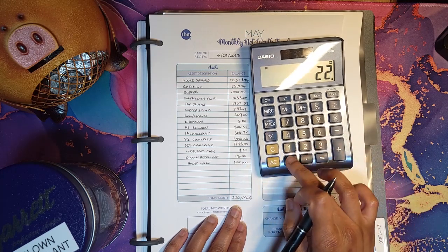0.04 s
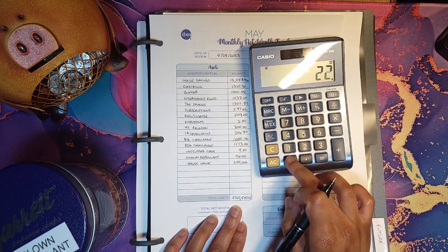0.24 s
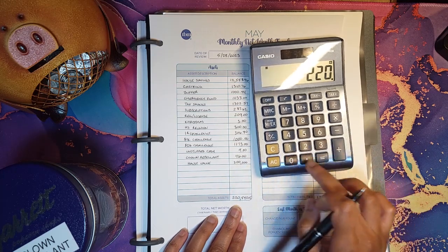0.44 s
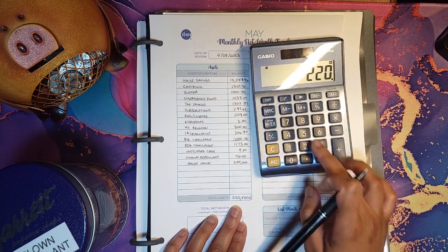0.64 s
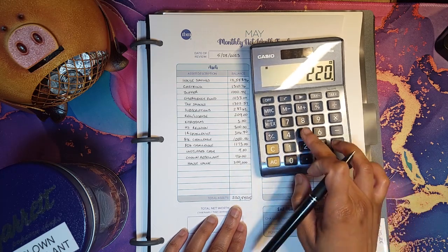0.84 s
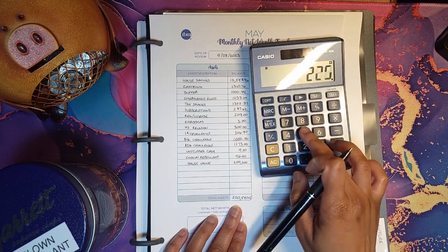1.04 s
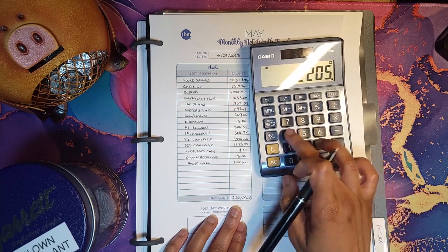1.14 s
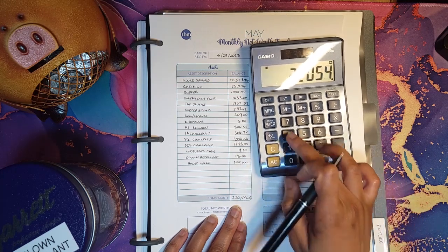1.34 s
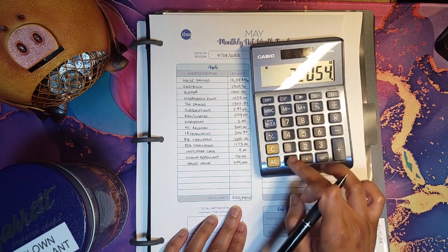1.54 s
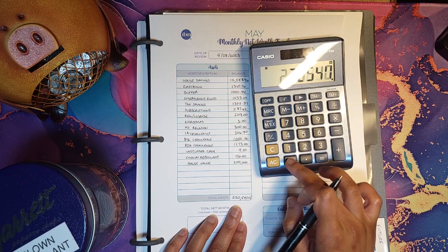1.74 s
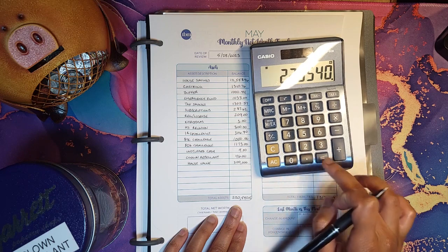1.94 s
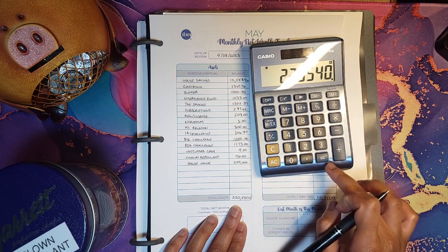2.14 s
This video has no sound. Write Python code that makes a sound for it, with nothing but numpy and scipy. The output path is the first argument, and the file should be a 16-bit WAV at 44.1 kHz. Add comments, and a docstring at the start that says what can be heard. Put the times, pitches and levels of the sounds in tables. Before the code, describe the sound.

A finger presses plastic calculator keys: two early taps, a pause, then several irregular clicks. Soft booms through desk and dull paper thuds accompany them, over low rumble and faint hiss, heard close in a small room.

```python
"""A small quiet room: a finger works the plastic keys of a desktop calculator lying on a paper binder.
Each key clicks thinly and knocks the hollow case, made by short noise bursts that set dying tones ringing.
The finger's weight booms the desk top a moment apart, the binder thuds dully and keys brush in their guides.
The microphone is fixed to the desk, nearly mono; shaped noise gives a low rumble and faint hiss."""
import sys
import numpy as np
from scipy import signal
from scipy.fft import rfft, irfft
from scipy.io import wavfile

SR = 44100
rng = np.random.default_rng(int(sys.argv[2]) if len(sys.argv) > 2 else 0)


def attenuation_scalar(level_db):
    """Turn a level in dB into a linear amplitude multiplier (20 dB per decade)."""
    decades = np.asarray(level_db, float) / 20
    return 10 ** decades


def store_wav(level_fs):
    """Save 16-bit WAV to argv[1]."""
    pcm = np.round(np.clip(np.atleast_2d(level_fs), -1, 1) * 32767)
    wavfile.write(sys.argv[1], SR, pcm.T.astype(np.int16))


N = 97020  # length in samples, 2.2 s


def read(points, hz):
    """Reads a table of pitches, in straight lines along log frequency."""
    f, value = np.transpose(points)
    return np.interp(np.log(hz + 1), np.log(f + 1), value)


def add(mix, s, sound):
    """Mixes a sound in at a time in seconds."""
    part = mix[round(s * SR):][:len(sound)]
    part += sound[:len(part)]


def ring(hz, t60, t):
    """One mode: a pure tone that falls by 60 dB in t60 seconds."""
    return attenuation_scalar(-60 * t / t60) * np.sin(2 * np.pi * hz * t)


def coloured(shape):
    """Steady noise of a given spectrum, scaled to unit rms above 150 Hz."""
    hz = np.fft.rfftfreq(N, 1 / SR)
    z = rfft(rng.standard_normal(N)) * attenuation_scalar(read(shape, hz))
    return irfft(z, N) / np.std(irfft(z * (hz > 150), N))


def body(modes, centre_hz, spread_oct, t):
    """Ringing of a set of modes, strongest around one pitch, scaled to unit energy."""
    rings = np.zeros(len(t))
    for k, (hz, db, t60) in enumerate(modes):
        rings += (-1) ** k * attenuation_scalar(db) * ring(hz, t60, t)
    hz = np.fft.rfftfreq(len(t), 1 / SR) + 1
    octaves = np.log2(hz / centre_hz)
    bump_db = np.maximum(-6. * (octaves / spread_oct) ** 2, -17.5)
    # minimum phase, so that nothing sounds ahead of the blow
    log_gain = np.log(attenuation_scalar(np.r_[bump_db, bump_db[-2:0:-1]]))
    causal = np.exp(np.conj(signal.hilbert(log_gain)))[:len(hz)]
    rings = irfft(rfft(rings) * causal, len(t))
    return rings / np.linalg.norm(rings)


# colour of the room air: (pitch [Hz], relative level [dB per Hz])
AIR_COLOUR = [(12, -26), (20, -29), (42, -13.5), (76, -7.5), (213, -24), (245, -19.5), (298, -29),
              (333, -28.5), (505, -44), (581, -34.5), (705, -34.5), (958, -42), (1160, -40.5), (1410, -42),
              (1980, -45.5), (3260, -45.5), (4950, -40), (8400, -49.5), (15500, -45)]


def middle_air():
    """Low rumble and faint hiss, alike in both ears: steady shaped noise."""
    return attenuation_scalar(-70.5) * coloured(AIR_COLOUR)


# colour of the air that differs between the ears: (pitch [Hz], relative level [dB per Hz])
SIDE_AIR_COLOUR = [(59, -13), (100, -74), (238, -68), (300, -8), (552, -13), (2370, -9.5), (4750, 1),
                   (15500, -12)]


def side_air():
    """Fainter shaped noise, opposite in the two ears."""
    return attenuation_scalar(-86.5) * coloured(SIDE_AIR_COLOUR)


def microphone_hiss():
    """The microphone's self-noise: even, faint white noise."""
    return attenuation_scalar(-89) * rng.standard_normal(N)


# modes of the desk top: (pitch [Hz], time to fall 60 dB [s])
DESK_MODES = [(35, 0.083), (57.5, 0.71), (91.6, 0.25), (118.2, 0.4), (195, 0.17), (250, 0.39)]
# how much each desk mode moves along with the third: (share [ratio])
PUSH_SHARES = [-0.29, -.18, 1, -0.22, 0.023, 0.045]
# how much each desk mode answers the trembling: (share [ratio])
SHAKE_SHARES = [0.1, 0.33, 3.13, 1.54, .12, 0.084]
# finger pushes and releases, the sign is the direction, before smoothing:
# (time [s], swing of the third mode [full scale], added swing of the fourth mode [full scale])
FINGER_PUSHES = [(.206, -0.011, -0.00046), (0.3934, -0.054, .034), (.448, 0.02, -0.0081),
                 (.524, .001, .007), (1.0178, -.013, 0.011), (1.1324, -0.038, 0.011),
                 (1.2032, -0.0065, -0.0037), (1.2641, 0.003, -0.045), (1.3447, 0.0012, -.007),
                 (1.3887, -0.044, 0.026), (1.453, 0.0078, 0.015), (1.5089, 0.0026, .001),
                 (1.664, 0.013, -0.012), (1.7927, 0.01, 0.0025), (1.8226, -0.045, 0.043),
                 (1.892, -0.012, -0.014)]
# the resting hands keep the desk trembling, before smoothing: (time [s], level [dB])
HAND_TREMBLE = [(0, -78), (.1, -55.5), (.2, -57.5), (0.361, -44), (.55, -59), (.59, -68), (.63, -60),
                (0.751, -63.5), (.86, -56), (0.942, -83), (1.001, -50.5), (1.19, -45), (1.5, -48),
                (1.58, -56.5), (1.721, -40.5), (1.769, -52), (1.952, -55.5), (2.2, -56)]


def desk():
    """Soft finger pushes ring the desk modes; a random shake keeps them murmuring."""
    t, boom = np.arange(SR) / SR, np.zeros(N)
    modes = np.array([ring(hz, t60, t) for hz, t60 in DESK_MODES])
    together = PUSH_SHARES @ modes
    for s, third, fourth in FINGER_PUSHES:
        add(boom, s, third * together + fourth * modes[3])
    shake = rng.standard_normal(N + SR)
    murmur = signal.fftconvolve(shake, SHAKE_SHARES @ modes, "valid")[:N]
    murmur /= np.sqrt(np.mean(murmur ** 2) + 1e-20)  # unit rms
    boom += murmur * attenuation_scalar(np.interp(np.arange(N) / SR, *np.transpose(HAND_TREMBLE)))
    # a smooth hump softens every movement
    hump_s = 0.0049
    u = (np.arange(2001) - 1000) / SR
    hump = np.cos(np.pi * np.clip(u / hump_s, -.5, .5)) ** 2
    return signal.fftconvolve(boom, hump / hump.sum(), "same")


# colour of the paper stack: (pitch [Hz], relative level [dB per Hz])
BINDER_COLOUR = [(120, -28), (170, 1.5), (250, -9), (400, -14), (600, -26), (900, -31), (15000, -78)]


def binder(boom):
    """The paper stack shuffles and thuds dully: noise whose strength follows the shaking desk."""
    memory_s, follow = 0.012, 0.62  # follow: dB of noise per dB of shake
    smoothing = np.exp(-1 / (memory_s * SR))
    shake_power = signal.lfilter([1], [1, -smoothing], boom ** 2) / (memory_s * SR)
    strength = (shake_power + 1e-12) ** (follow / 2)
    return attenuation_scalar(-41) * coloured(BINDER_COLOUR) * strength


# modes of keys and cover: (pitch [Hz], level before weighting [dB], time to fall 60 dB [s])
KEY_MODES = [(1950, 8.5, 0.004), (2660, 2, 0.0086), (3040, 4, 0.0066), (3600, 6, 0.009), (4190, 6, 0.0038),
             (5033, 5.5, 0.0096), (5270, 10, 0.0024), (6040, 2.5, .005), (6830, 0, 0.0037),
             (7630, -2.5, 0.0061), (8100, 2, 0.0022), (8600, -43, 0.0014), (11360, -10.5, 0.0011),
             (14400, -3, 0.0013)]


def key_body(bright_hz, t):
    """The thin ringing of the plastic keys and cover, strongest around bright_hz."""
    return body(KEY_MODES, bright_hz, 0.89, t)


# modes of the hollow case: (pitch [Hz], level before weighting [dB], time to fall 60 dB [s])
CASE_MODES = [(288, 2.5, 0.033), (478, -2, 0.027), (858, -3.5, 0.038), (997, 0, 0.032), (1200, 7, 0.017),
              (1523, 2.5, 0.02), (1830, -8, 0.036)]


def case_body(knock_hz, t):
    """The hollow ringing of the case, strongest around knock_hz."""
    return body(CASE_MODES, knock_hz, 0.56, t)


def strike(part, drive):
    """Sets a body ringing with a burst, keeping the body's own energy."""
    hit = signal.fftconvolve(part, drive)[:len(part)]
    return hit * np.linalg.norm(part) / np.linalg.norm(hit)


def click(level_db, bright_hz, knock_db, knock_hz):
    """A brief rattle rings the key; a blunter blow rings the case just after. Gives near and radiated sound."""
    rattle_s, knock_lag_s, knock_s = 0.0019, 0.0008, 0.00055
    t = np.arange(4096) / SR
    rattle, blow = rng.standard_normal((2, len(t)))
    keys = key_body(bright_hz, t)
    case = attenuation_scalar(knock_db) * case_body(knock_hz, t)
    rattle = np.sign(rattle) * np.exp(-t / rattle_s)
    late = np.maximum(t - knock_lag_s, 0)
    blow = blow * late * np.exp(-late / knock_s)
    near = strike(keys, rattle) + strike(case, blow)
    radiated = keys + case  # the plain ringing, sent on to the echoes
    return attenuation_scalar(level_db) * near, attenuation_scalar(level_db) * radiated


# key clicks, the last row a bright echo of the loud click just before it: (time [s], energy of the key part
# [dB], brightest pitch [Hz], # knock of the case relative to the click [dB], knock pitch [Hz])
KEY_CLICKS = [(.2172, -32, 5150, -6, 755), (.232, -48, 3780, -16, 846), (.3408, -20, 3600, -15.5, 1220),
              (.3475, -19, 4520, -5, 1330), (.9802, -32.5, 3020, -10.5, 1200),
              (1.0868, -27.5, 2980, -5.5, 1200), (1.0908, -32, 3040, -18, 1200),
              (1.0985, -22.5, 3240, -8.5, 1200), (1.2428, -27.5, 2220, 6, 880),
              (1.3395, -28, 3870, -10, 1290), (1.344, -30, 3760, 2, 1380), (1.35, -18, 4040, -5.5, 1350),
              (1.6555, -40, 3780, -2.5, 1110), (1.7738, -20, 3590, -32, 1300),
              (1.7785, -15.5, 4540, -4, 1250), (1.797, -28.5, 8100, -10, 1330)]


def key_clicks():
    """All clicks as heard close by, and what they radiate, dealt in turn to three sets of echoes."""
    near, far = np.zeros(N), np.zeros((3, N))
    for k, (s, *row) in enumerate(KEY_CLICKS):
        direct, radiated = click(*row)
        add(near, s, direct)
        add(far[k % 3], s, radiated)
    return near, far


def brush(fade_s, level_db, bright_hz):
    """Soft friction noise through the key modes, swelling and fading."""
    rise_s = 0.0059
    t = np.arange(8192) / SR
    rub = signal.fftconvolve(rng.standard_normal(len(t)), key_body(bright_hz, t))[:len(t)]
    return attenuation_scalar(level_db) * rub * np.minimum(t / rise_s, 1) * np.exp(-t / fade_s)


# keys brushing in their guides around a touch:
# (time [s], fade [s], level before swell and fade [dB], brightest pitch [Hz])
KEY_BRUSHES = [(.224, 0.037, -63.5, 4030), (.326, 0.026, -61.5, 3700), (0.986, 0.059, -66, 3830),
               (1.226, .015, -63, 2060), (1.255, 0.037, -61.5, 5000), (1.385, 0.028, -58, 5000),
               (1.664, 0.051, -67.5, 4370), (1.788, 0.026, -70, 8500)]


def key_brushes():
    """All the brushing of the keys in their guides."""
    out = np.zeros(N)
    for s, *row in KEY_BRUSHES:
        add(out, s, brush(*row))
    return out


# how fast the echoes die: (pitch [Hz], time to fall 60 dB [s])
ECHO_FADE = [(500, 0.58), (1300, 0.25), (3500, 0.33), (9000, 0.36), (14000, 0.067)]
# colour of the echoes: (pitch [Hz], relative level [dB])
ECHO_COLOUR = [(300, 2.5), (1000, -7.5), (2000, 1.5), (4000, -15.5), (8000, -2.5), (13000, 6.5)]


def room(x):
    """Sparse echoes of random sign that build up, then die band by band, as middle and a faint side."""
    start_s, rise_s, first_share = 0.0095, 0.004, 0.81
    ceiling_s, ceiling_width_s, ceiling_db = 0.023, 0.0064, 3.5  # the first strong group of echoes
    echo_db, side_db = 3., -28  # side relative to middle
    # one echo at a random place in every ten samples
    taps = np.zeros((2, SR // 2))
    jitter = rng.integers(0, 10, (2, (SR // 2 - 11) // 10))
    at = np.arange(0, SR // 2 - 20, 10) + jitter
    np.put_along_axis(taps, at, rng.choice([-1., 1.], at.shape), 1)
    hz, t, z = signal.stft(taps, SR, nperseg=256)
    fade_db = -60 * t / read(ECHO_FADE, hz)[:, None]
    z *= attenuation_scalar(read(ECHO_COLOUR, hz)[:, None] + fade_db)
    tail = signal.istft(z, SR, nperseg=256)[1]
    t = np.arange(tail.shape[1]) / SR
    tail *= np.clip((t - start_s) / rise_s, first_share, 1)
    tail *= attenuation_scalar(ceiling_db * np.exp(-((t - ceiling_s) / ceiling_width_s) ** 2))
    tail /= np.linalg.norm(tail[0])
    echoes = signal.fftconvolve(x[None], tail, axes=1)[:, :N]
    return attenuation_scalar([[echo_db], [echo_db + side_db]]) * echoes


def scene():
    """Adds up clicks, echoes, desk boom and room air as middle and side, then gives left and right."""
    near, far = key_clicks()
    near += key_brushes() + microphone_hiss()
    mid, side = sum(room(part) for part in far)
    boom = desk()
    mid = mid + near + boom + binder(boom) + middle_air()
    side = side + side_air() + attenuation_scalar(-43) * mid  # the whole leans slightly left
    return np.array([mid + side, mid - side])


def roll_off(x):
    """The treble ends steeply here."""
    return signal.sosfilt(signal.butter(12, 15840, fs=SR, output="sos"), x)


def record(dry):
    """Takes away the treble above about 15.85 kHz and finishes the mix."""
    edge = signal.firwin(511, 15850, window=("kaiser", 9), fs=SR)
    mix = signal.oaconvolve(dry, edge[None], "same", axes=1)
    return roll_off(mix)


dry = scene()
out = record(dry)
store_wav(out)
```